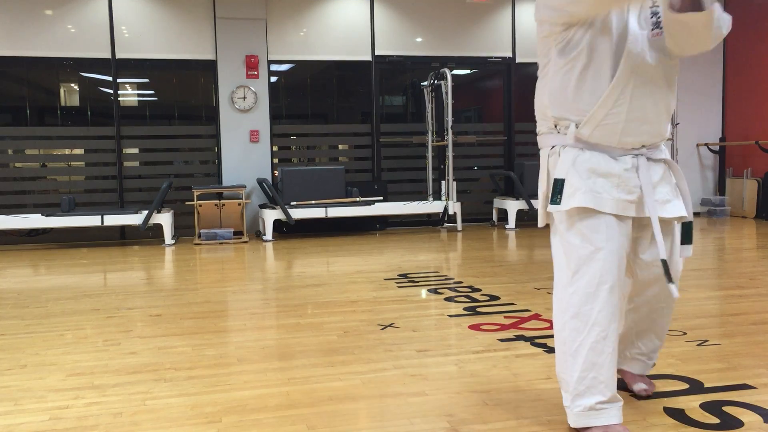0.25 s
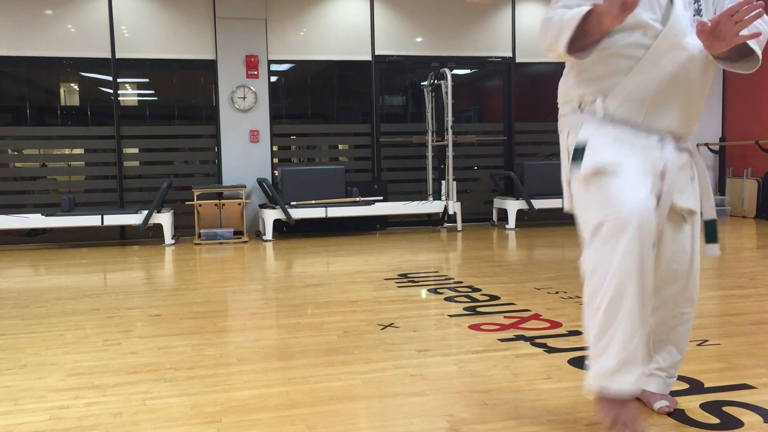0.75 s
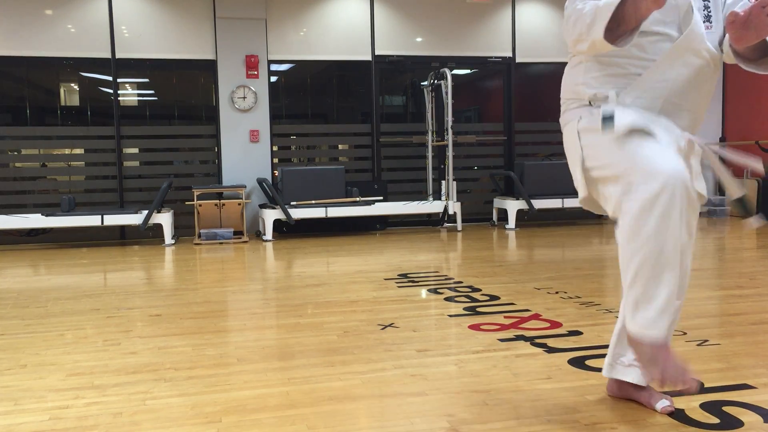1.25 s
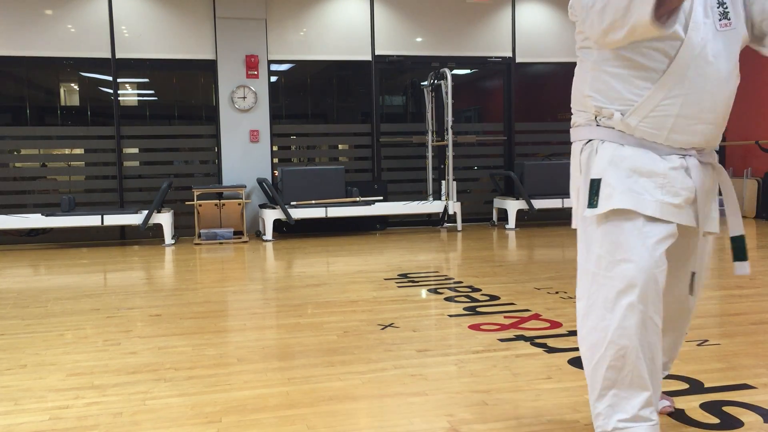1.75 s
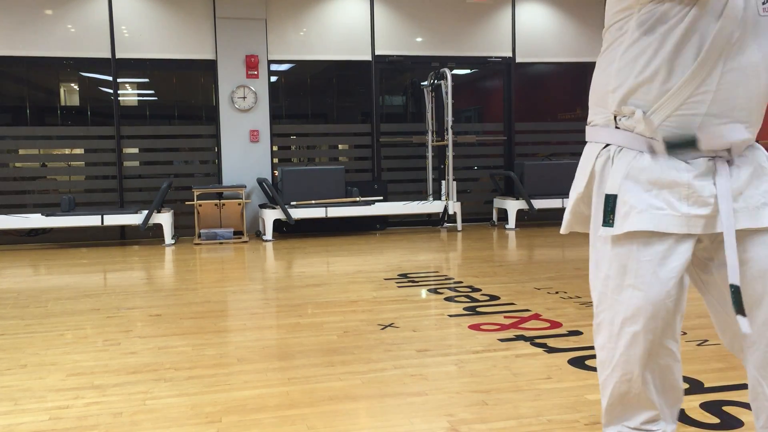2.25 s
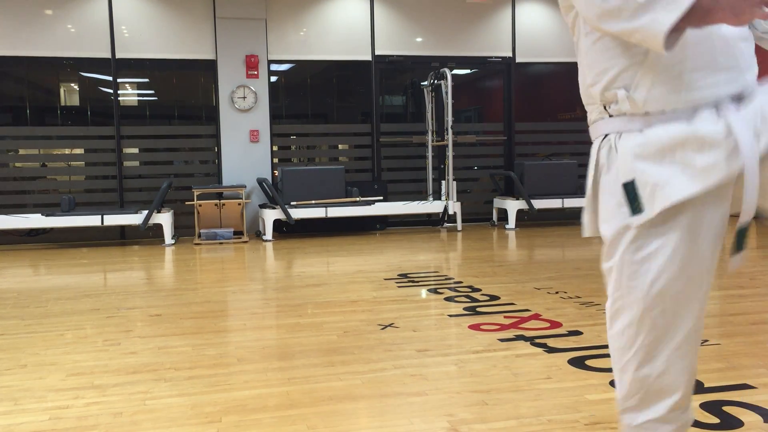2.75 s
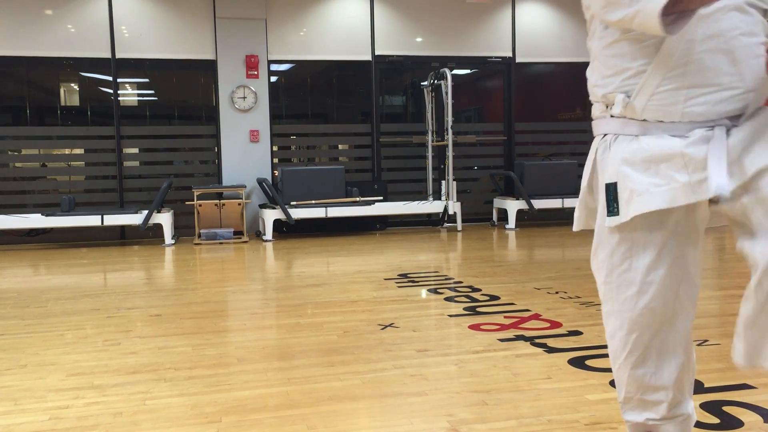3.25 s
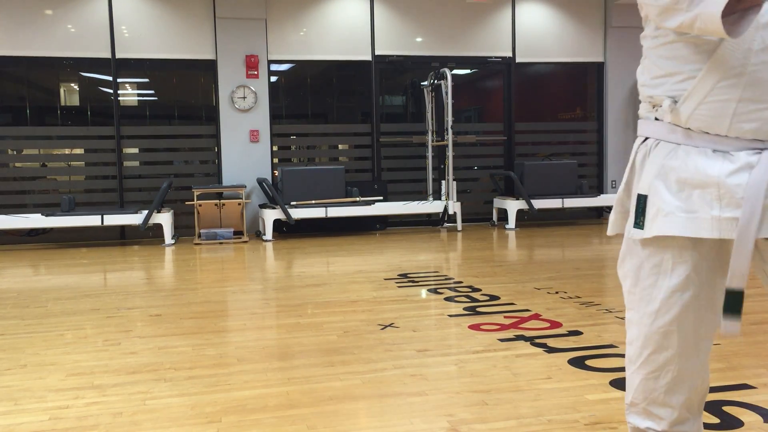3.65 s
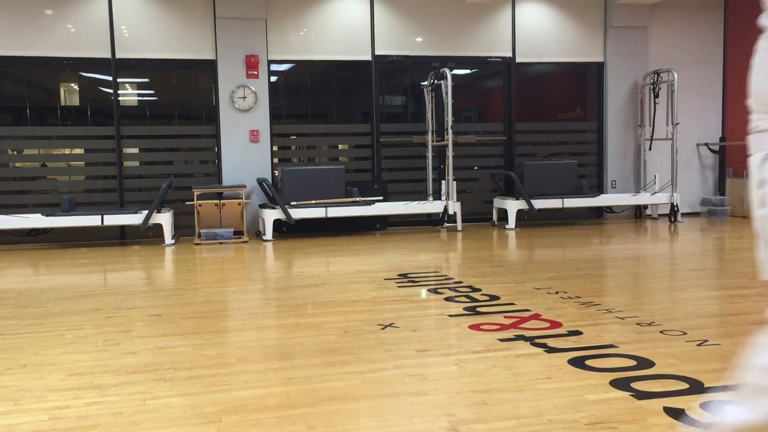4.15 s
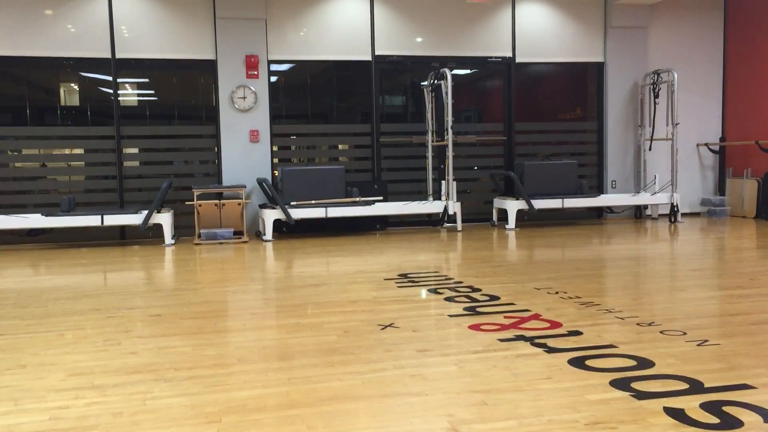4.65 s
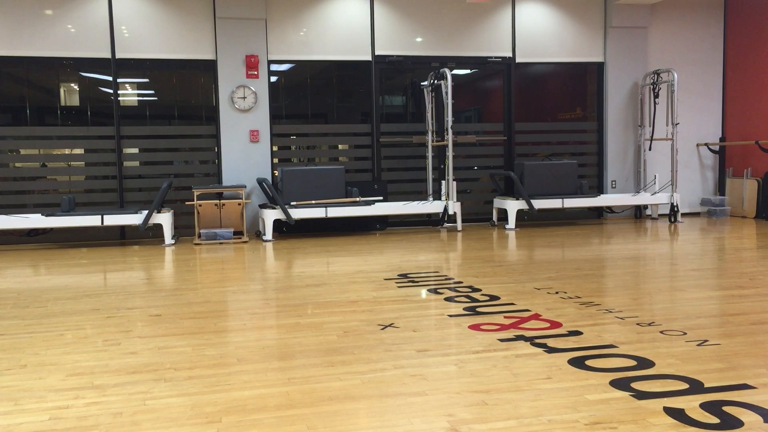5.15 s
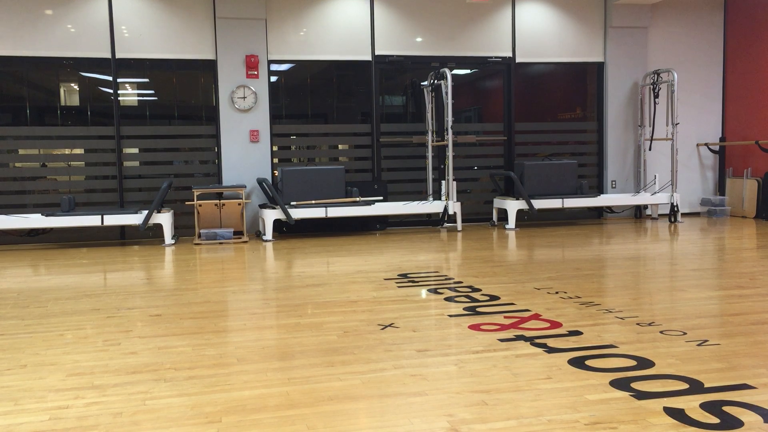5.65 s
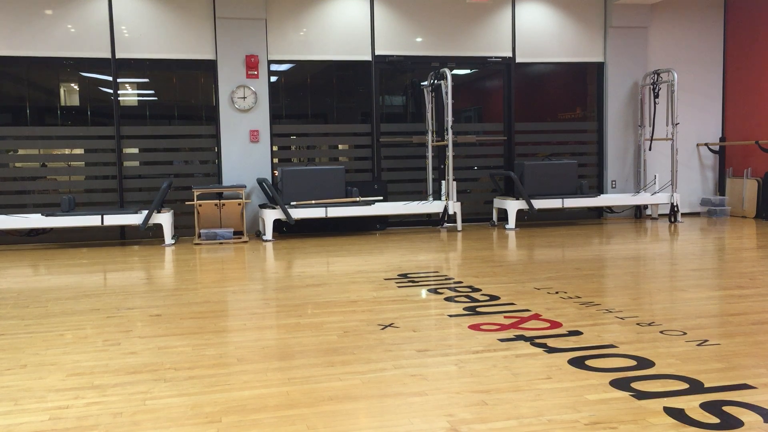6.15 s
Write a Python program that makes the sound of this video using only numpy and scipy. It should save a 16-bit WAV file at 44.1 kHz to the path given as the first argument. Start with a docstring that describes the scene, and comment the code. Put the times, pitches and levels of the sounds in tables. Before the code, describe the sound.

Bare feet shift and step softly on sprung wooden boards in a large, hard-walled studio while stiff cotton flaps, swishes and snaps in bursts. A faint sole squeak passes midway. Late on, a heel stamps with a deep, ringing boom, followed about half a second later by a very sharp smack that echoes. Quiet ventilation hums beneath; the stationary microphone hears it all with room reverberation.

```python
"""In a large, hard-walled studio, bare feet step and pivot on a sprung wooden floor.
Stiff cotton flaps and swishes as shaped noise and snaps as short crackles; a sole squeaks faintly.
A heel stamps once as a falling tone that rings the boards; a hand smacks once as a cluster of cracks.
Ventilation rumbles and hums underneath. Wall echoes and a noisy tail throw the blows back."""
import sys
import numpy as np
from scipy import signal
from scipy.fft import rfft, irfft
from scipy.io import wavfile
from scipy.ndimage import uniform_filter1d

SR = 44100
rng = np.random.default_rng(int(sys.argv[2]) if len(sys.argv) > 2 else 0)


def master_out(mix):
    """Clip the mix to full scale and print it as 16-bit PCM to the path in sys.argv[1]."""
    frames = np.transpose(np.atleast_2d(mix))
    ceiling = np.clip(frames, -1, 1)
    pcm = np.round(ceiling * 32767).astype(np.int16)
    wavfile.write(sys.argv[1], SR, pcm)


N = 281799  # length in samples
HOP = 128  # samples between two steps of a slow level curve

# Ventilation noise: pitch_hz, relative_level_db (per Hz)
AIR_SPECTRUM = [(15, -44), (25, -14), (123, 1), (195, -11), (384, -18), (489, -23), (641, -23), (1400, -28),
                (2110, -29), (4870, -38), (5570, -37), (10400, -45), (14800, -46), (16000, -51)]
AIR_DB, HUM_HZ, HUM_DB = -58, 119.4, -62.5

# How long the room rings: pitch_hz, time_to_fall_60_db_s
ROOM_DECAY = [(100, 1.5), (500, 0.33), (1400, 0.44), (2700, 0.59), (5400, 0.62), (11000, 0.21)]
# First echoes from floor and near walls: delay_s, level_db
FIRST_ECHOES = [(.0035, -14), (.008, -13)]

# Faint squeak as a sole peels off the varnish: start_s, length_s, base_level_db
SOLE_SQUEAK = (2.553, 0.11, -63)
# Resonances of that sole: pitch_hz, width_hz, level_db
SOLE_RESONANCES = [(1201, 18, -4), (2080, 62, -8), (2310, 65, -7), (2600, 59, -9), (4430, 210, -14)]

# Shifts of the body: peak_s, rise_s, hold_s, fall_s, boards_db, flapping_cloth_db
BODY_MOVES = [(0.0, .1, 0.21, 0.55, -64, -77), (0.267, 0.12, 0.0092, 0.19, -57, -61),
              (0.425, 0.14, 0.009, 0.1, -45.5, -52), (0.835, 0.066, 0.0087, 0.28, -51.5, -69),
              (1.16, 0.49, 0.021, 0.41, -47.5, -41.5), (1.938, 0.095, 0.079, 0.24, -49, -55.5),
              (2.162, 0.12, 0.23, 0.12, -50, -55.5), (2.767, 0.093, 0.012, 0.3, -49.5, -45),
              (3.087, 0.3, 0.062, 0.31, -44.5, -45), (3.586, 0.084, 0.086, 0.1, -59, -65.5),
              (4.156, 0.24, 0.54, 0.2, -52.5, -54), (4.644, 0.17, .01, 0.14, -42.5, -42.5),
              (5.168, 0.24, 0.011, 0.23, -49.5, -39), (5.403, .1, 0.04, 0.21, -58.5, -56),
              (5.705, 0.068, 0.11, 0.094, -54, -52.5), (6.327, 0.29, .05, .1, -53.5, -61)]
# Boards under the moving weight: pitch_hz, relative_level_db (per Hz)
WEIGHT_SPECTRUM = [(18, -53), (30, -9), (97, 6), (135, -0.5), (161, 1), (230, -4), (400, -4.5), (520, -34),
                   (880, -120)]
# Footfalls: start_s, level_db, pitch_hz (near the end of the push), push_length_s
FOOTFALLS = [(0.323, -33.5, 201, 0.029), (0.357, -41, 189, 0.022), (1.131, -39, 102, 0.043),
             (1.554, -43.5, 181.4, 0.039), (1.958, -35, 129, 0.011), (3.069, -39, 109, 0.033),
             (3.56, -40.5, 138, 0.023), (4.506, -8, 125, 0.02), (5.137, -24.5, 209.5, 0.016),
             (5.741, -36.5, 82.3, 0.013), (6.229, -42, 156.4, 0.023), (6.331, -42.5, 138, 0.014)]
# Ringing notes of the boards: pitch_hz, relative_level_db, time_to_fall_60_db_s
BOARD_NOTES = [(84.6, -10, 0.61), (112, -6.5, 0.3), (140.5, -4, 0.33), (162.3, -1.5, 0.45), (186, -7, 0.36),
               (213.5, 1, 0.33), (328, -5, 0.2)]

# Flapping folds: pitch_hz, relative_level_db (per Hz)
FLAP_SPECTRUM = [(71, -49.5), (120, 1), (308, 3.5), (528, 4), (691, 2), (1060, -6), (2170, -20.5),
                 (3000, -34), (3900, -60), (6600, -120)]
# Rubbing threads: pitch_hz, relative_level_db (per Hz)
SWISH_SPECTRUM = [(350, -49.5), (600, -24), (779, -12.5), (931, -10.5), (1160, -6.5), (1330, -6),
                  (2440, -4), (3580, -9), (4980, -13), (6370, -12.5), (7620, -19), (9360, -16),
                  (16000, -22.5)]
# Strokes of cloth or sole: peak_s, rise_s, hold_s, fall_s, level_db, brightness_db (per octave),
# thin_hiss_share_db
RUB_STROKES = [(0.234, 0.029, .005, 0.15, -56, -2.8, -19), (0.399, 0.055, 0.034, 0.15, -46.5, -3, -34),
               (0.785, .015, 0.32, 0.077, -69, -1.2, -30), (1.145, 0.036, 0.0058, .17, -48, -4.5, -15.5),
               (1.833, 0.021, .005, 0.36, -60, -1, -26), (2.151, 0.0065, 0.01, 0.17, -51.5, -5, -10),
               (2.313, 0.056, 0.037, 0.14, -45.5, -3.5, -35), (2.74, 0.13, .05, 0.09, -65.5, 1.5, -33),
               (2.926, 0.15, 0.11, 0.19, -65.5, 0.8, -13), (3.079, 0.072, 0.017, .17, -50, -5.5, -19),
               (3.594, .012, .005, 0.066, -64, 1.5, -19), (4.059, 0.044, 0.003, 0.061, -61.5, -7, -20),
               (4.156, 0.095, 0.0076, 0.26, -61, 0.9, -20), (4.514, .075, 0.11, 0.15, -43.5, -4, -18),
               (5.134, 0.2, 0.046, 0.062, -58, -4.5, -24), (5.266, 0.089, 0.043, 0.16, -46.5, -2, -25),
               (5.738, 0.038, 0.0057, 0.022, -45.5, -6.5, -20), (5.815, .1, 0.029, 0.034, -49, -0.4, -10),
               (6.236, 0.018, .005, 0.044, -57, -2, -16), (6.32, 0.03, 0.041, 0.087, -71.5, 5.5, -24)]
SWELL_DB = 20  # covered by a rise or a fall at steepness 1
FLAP_STEEPER = 1.74  # the cloth starts and settles faster than the boards
PATCHY_DB = 3.5  # the swish gathers in brief patches of colour
HISS_HZ, HISS_WIDTH_HZ = 6250, 560  # width of one filter pass

# Cloth snaps, toe ticks and the cracks of the smack: start_s, peak_db, centre_hz,
# knock_share_db, treble_share_db
SNAP_EVENTS = [(0.1, -50, 860, 16, -30), (0.234, -49, 2080, 9, -16), (0.242, -47, 1490, 7, -1),
               (0.28, -44, 1170, -16, 3), (0.793, -44, 2790, -6, -7), (0.863, -46, 1120, -14, -9),
               (0.959, -42.5, 1140, -14, -22), (1.012, -33.5, 830, 2, -22), (1.075, -36, 900, -2, -30),
               (1.123, -34, 1900, -20, -39), (1.143, -30.5, 920, 10, -8), (1.159, -24.5, 1040, -7, -35),
               (1.187, -30, 980, -6, -28), (1.296, -26, 840, 38, -40), (1.36, -34.5, 1040, -12, -27),
               (1.493, -42, 1150, 7, -15), (1.592, -52, 1260, 1, -10), (1.853, -37, 1100, 0.5, -39),
               (1.948, -36.5, 1220, -9, -14.5), (2.1491, -21.5, 1450, -12, -6), (2.3, -45, 1150, -8, -28),
               (2.553, -36, 2600, -32, -18), (2.694, -41.5, 2420, -17, 3), (2.758, -42, 1080, -9, -16),
               (2.784, -39.5, 1000, 11.5, -2.5), (2.913, -44.5, 1230, -14, -7), (3.02, -36, 890, 19, -29),
               (3.051, -31, 964, 4, -12), (3.076, -27.5, 1430, 3.5, -22), (3.091, -20.5, 1670, -14, -29),
               (3.25, -37.5, 960, 31, -30), (3.598, -36, 2180, -28, -12), (3.647, -42, 900, -30, -20),
               (4.065, -36.5, 1480, -27, -4), (4.119, -49, 950, -25, -30), (4.153, -36.5, 980, -14, -18),
               (4.303, -38, 860, 25, -35), (4.394, -45, 940, 19, -32), (4.425, -37, 866, 0, -35),
               (4.479, -34.5, 2100, -17, -16), (4.509, -18, 3330, -24, 0), (4.542, -25.5, 890, -28, -28),
               (4.874, -50, 980, -18, -4), (4.976, -45.5, 860, 11, -39), (5.025, -41.5, 1310, -22, -40.5),
               (5.099, -35, 820, 1, -28.5), (5.136, -21.5, 2860, 9, -5), (5.1443, -7.5, 3140, -20.5, -12),
               (5.1463, -4.5, 2930, -8, -2), (5.1481, -3.5, 2770, -8.5, -11),
               (5.151, -12, 1020, -33, -13.5), (5.154, -14.5, 2120, -9.5, -0.5), (5.43, -38, 900, -12, -33),
               (5.478, -24.5, 990, -43, -33), (5.543, -62, 1300, -18, -41.5), (5.664, -46, 981, 5, -31),
               (5.732, -28, 963, 25, -34), (6.057, -43.5, 926, -6, -16), (6.2293, -30.5, 2020, -9, -6),
               (6.318, -42.5, 2190, -16, -27), (6.327, -31, 1330, -33, -11.5)]
KNOCK_HZ = 570
CRACKLE_T60_MS, CHANGE_MS_PER_DB = 20.8, -0.01  # 60 dB fall at -41 dB; louder is very slightly shorter

# Colour of the microphone housing: pitch_hz, width_hz, level_db
HOUSING_COLOUR = [(4780, 1500, 1), (8300, 430, -1), (10560, 920, -4)]
TREBLE_EDGE_HZ = 15900


def gain_of(db):
    """Turns decibels into a multiplier."""
    return 10 ** (np.asarray(db) / 20)


def evened(x):
    """Scales a sound to an average (rms) level of 1."""
    return x / np.sqrt(np.mean(x ** 2) + 1e-20)


def read(points, hz):
    """Reads a pitch table between its points, on a logarithmic pitch scale."""
    f, value = np.transpose(points)
    return np.interp(np.log(hz + 1), np.log(f + 1), value)


def add(mix, start_s, sound):
    """Mixes a sound in at its start time, cut off at the end of the mix."""
    part = mix[round(start_s * SR):][:len(sound)]
    part += sound[:len(part)]


def coloured(x, spectrum):
    """Shapes x by a spectrum, rms 1."""
    gain = gain_of(read(spectrum, np.fft.rfftfreq(N, 1 / SR)))
    return evened(irfft(rfft(x) * gain, N))


def band(x, low_hz, high_hz):
    """Keeps the part of a sound between two pitches."""
    return signal.lfilter(*signal.butter(2, [low_hz, high_hz], "band", fs=SR), x)


def resonance(x, hz, width_hz):
    """Rings at one pitch; a narrower width rings longer."""
    return signal.lfilter(*signal.iirpeak(hz, hz / width_hz, SR), x)


def smoothed_patches(shape, pitch_bins, frames):
    """Random numbers blurred over neighbouring pitches and moments, so they form patches."""
    patches = uniform_filter1d(rng.standard_normal(shape), size=pitch_bins, axis=0)
    return evened(uniform_filter1d(patches, size=frames, axis=1))


def grains(per_s, spread_db):
    """Sparse clicks of random sign; a few are large."""
    size = gain_of(spread_db * np.minimum(rng.exponential(1, N), 4))
    present = rng.random(N) < per_s / SR
    return evened(size * rng.standard_normal(N) * present)


def swells(rows, steeper):
    """One level curve a row, peak 1: a rise, a hold and a fall, straight in dB."""
    t = np.arange(0, N + HOP, HOP) / SR
    peak, rise, hold, fall = abs(np.array([row[:4] for row in rows]).T[:, :, None])
    before = np.maximum((peak - t) / rise, 0)
    after = np.maximum((t - peak - hold) / fall, 0)
    return gain_of(-SWELL_DB * steeper * (before + after))


def spread(frames):
    """Fills in a slow level curve so that every sample has a value."""
    return np.interp(np.arange(N), HOP * np.arange(len(frames)), frames)


def air():
    """Duct rumble and hiss, with a motor hum that wavers in pitch and level."""
    waver = evened(uniform_filter1d(rng.standard_normal(N), 3000))
    hum = np.sqrt(2) * np.sin(2 * np.pi * np.cumsum(HUM_HZ + 0.5 * waver) / SR)
    hum *= 1 + 0.12 * np.roll(waver, SR)  # the level follows the same waver, shifted by 1 s
    rumble = coloured(rng.standard_normal(N), AIR_SPECTRUM)
    return gain_of(AIR_DB) * rumble + gain_of(HUM_DB) * hum


def walls(x):
    """Two single echoes from floor and near walls, added to the direct sound."""
    taps = np.zeros(SR // 10)
    taps[0] = 1
    for delay_s, db in FIRST_ECHOES:
        add(taps, delay_s, gain_of([db]))
    return signal.oaconvolve(x, taps)[:N]


def tail(x, build_s, patchy_db):
    """The energy of each band builds up, dies at its own speed and is heard as diffuse noise."""
    hz, _, z = signal.stft(x, SR, nperseg=512, noverlap=384)
    power = uniform_filter1d(abs(z) ** 2, size=11, axis=0)
    stay = np.exp(-HOP / SR / build_s)
    power = signal.lfilter([0, 0, 0, 1 - stay], [1, -stay], power)  # begins three frames late
    keep = gain_of(-2 * 60 * HOP / SR / read(ROOM_DECAY, hz))  # doubled dB, as this is power
    power = np.array([signal.lfilter([1 - k], [1, -k], p) for k, p in zip(keep, power)])
    real, imaginary = rng.standard_normal((2,) + z.shape)
    power *= gain_of(2 * patchy_db * smoothed_patches(z.shape, pitch_bins=6, frames=14))
    noise = np.sqrt(abs(power)) * (real + 1j * imaginary)
    return signal.istft(noise, SR, nperseg=512, noverlap=384)[1][:N]


def squeak():
    """Stick-slip noise in narrow resonances, strongest near the start."""
    start_s, length_s, db = SOLE_SQUEAK
    out, t = np.zeros(N), np.arange(0, length_s, 1 / SR)
    slips = rng.standard_normal(SR // 2)
    ring = sum(gain_of(share_db) * evened(resonance(slips, hz, width_hz))
               for hz, width_hz, share_db in SOLE_RESONANCES)
    grip = signal.windows.tukey(len(t), .08) * (1 + 5.9 * np.exp(-t / 0.021))
    add(out, start_s, gain_of(db) * grip * ring[-len(t):])
    return out


def weight_on_boards():
    """Low noise from the boards swells as the body's weight shifts."""
    level = gain_of(np.transpose(BODY_MOVES)[4]) @ swells(BODY_MOVES, steeper=1)
    return spread(level) * coloured(rng.standard_normal(N), WEIGHT_SPECTRUM)


def footfalls():
    """A bending wave runs through the boards, high notes first; then the boards ring on."""
    out, t = np.zeros(N), np.arange(SR // 2) / SR
    ring = sum(gain_of(db - 60 * t / t60_s) * np.sin(2 * np.pi * hz * t)
               for hz, db, t60_s in BOARD_NOTES)
    for start_s, db, hz, length_s in FOOTFALLS:
        u = np.arange(0, length_s, 1 / SR)
        falling_hz = hz * (0.957 + 1.85 * np.exp(-(u / 0.0049) ** 2))
        push = np.sin(2 * np.pi * np.cumsum(falling_hz) / SR)
        push *= signal.windows.tukey(len(u), .55)
        sound = 0.0012 * signal.fftconvolve(push, ring)[:len(t)]
        add(sound, 0, push)
        add(out, start_s, gain_of(db) * sound)
    return out


def flapping():
    """Folds of cloth flap in uneven lumps of noise as the body moves."""
    lumps = evened(signal.oaconvolve(abs(grains(140, spread_db=3)), np.hanning(250), "same"))
    flap = coloured((1.8 + lumps) * rng.standard_normal(N), FLAP_SPECTRUM)
    level = gain_of(np.transpose(BODY_MOVES)[5]) @ swells(BODY_MOVES, FLAP_STEEPER)
    return spread(level) * flap


def rubbing():
    """Threads rub in a dense, gritty swish with a thin hiss on top."""
    grit = grains(1500, spread_db=4)
    threads = coloured(0.45 * grit + rng.standard_normal(N), SWISH_SPECTRUM)
    hz, _, z = signal.stft(threads, SR, nperseg=256)
    level_db, brightness_db, hiss_db = np.transpose(RUB_STROKES)[4:]
    strokes = gain_of(level_db)[:, None] * swells(RUB_STROKES, steeper=1)
    level = strokes.sum(0) + 1e-12

    # overlapping strokes share their brightness in proportion to their levels
    octaves = np.log2(np.clip(hz, 700, 12000) / 2500)
    tilt_db = np.outer(octaves, brightness_db @ strokes / level)
    patches = smoothed_patches(tilt_db.shape, pitch_bins=3, frames=9)
    shaped = z[:, :len(level)] * gain_of(tilt_db + PATCHY_DB * patches) * level
    swish = signal.istft(shaped, SR, nperseg=256)[1]

    hiss = rng.standard_normal(N)
    for _ in range(2):
        hiss = resonance(hiss, HISS_HZ, HISS_WIDTH_HZ)
    rub = spread(gain_of(hiss_db) @ strokes) * evened(hiss)
    add(rub, 0, swish)
    return rub


def snaps():
    """Each is a click with a short dying crackle: a broad resonance, a hollow knock and some treble."""
    out, t = np.zeros(N), np.arange(3000) / SR
    noise = rng.standard_normal((len(SNAP_EVENTS), len(t)))
    rise = 55  # samples over which the crackle builds up before the click
    build_up = np.minimum(t * SR / rise, 1) ** 2
    click = np.arange(len(t)) == rise
    for (start_s, db, hz, knock_db, treble_db), crackle in zip(SNAP_EVENTS, noise):
        t60_ms = CRACKLE_T60_MS + CHANGE_MS_PER_DB * (db + 41)
        burst = (build_up * crackle + 8.96 * click) * gain_of(-60 * 1000 * t / max(t60_ms, 2))
        body = evened(band(burst, hz / 1.78, hz * 1.54))
        knock = evened(band(burst, KNOCK_HZ / 1.28, KNOCK_HZ * 1.2))
        treble = evened(band(burst, 3000, 12000))
        snap = body + gain_of(knock_db) * knock + gain_of(treble_db) * treble
        add(out, start_s, gain_of(db) * snap / abs(snap).max())
    return out


def scene():
    """Snaps and the squeak fill the room most; the softer sounds carry less tail."""
    sharp = snaps() + squeak()
    soft = footfalls() + weight_on_boards() + flapping() + rubbing()
    sent_to_room = gain_of(-7.0) * sharp + gain_of(-17.0) * soft
    room = tail(sent_to_room, build_s=0.0066, patchy_db=2.2)
    return (walls(sharp) + soft + room + air())[None]


def record(dry):
    """The microphone housing lifts and dips some treble; the deep bass and top treble are cut."""
    hz = np.linspace(0, SR / 2, 257)
    colour_db = sum(db * np.exp(-((hz - f) / width_hz) ** 2) for f, width_hz, db in HOUSING_COLOUR)
    housing = signal.firwin2(201, hz, gain_of(colour_db), fs=SR)
    heard = signal.oaconvolve(dry, housing[None], "same")
    heard = signal.lfilter(*signal.butter(2, 45, "high", fs=SR), heard)
    treble_cut = signal.firwin(511, TREBLE_EDGE_HZ, window=("kaiser", 9), fs=SR)
    return signal.oaconvolve(heard, treble_cut[None], "same")


dry = scene()
out = record(dry)
master_out(out)
```